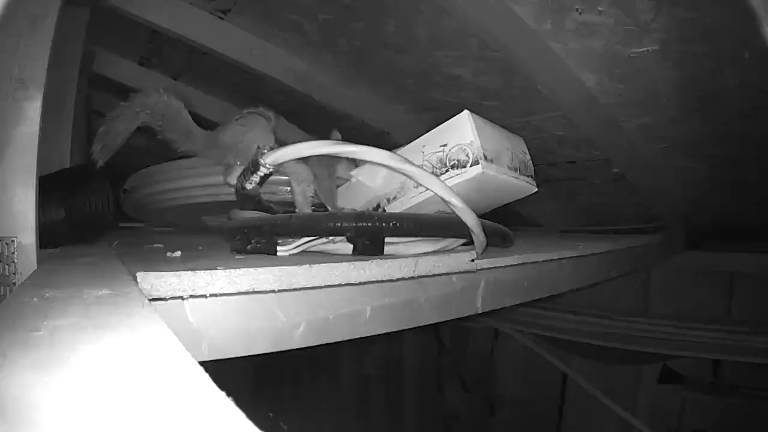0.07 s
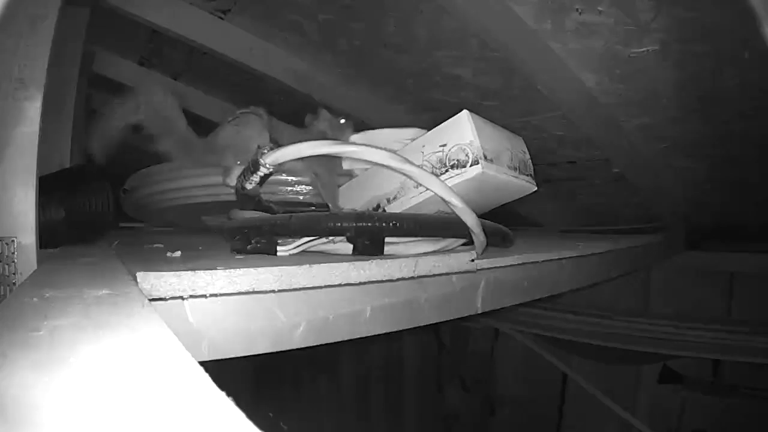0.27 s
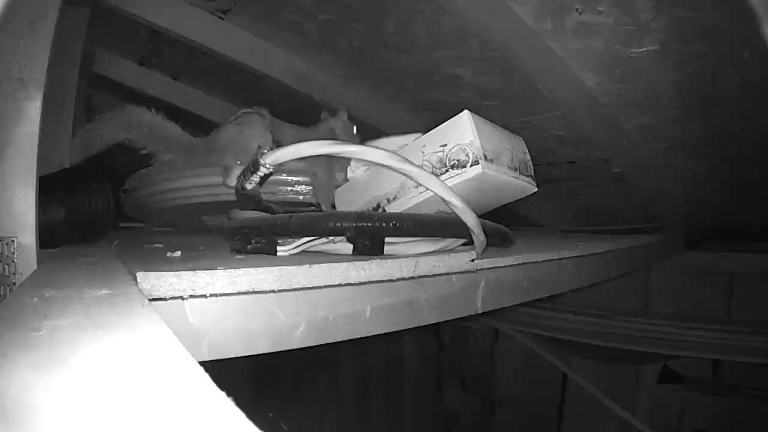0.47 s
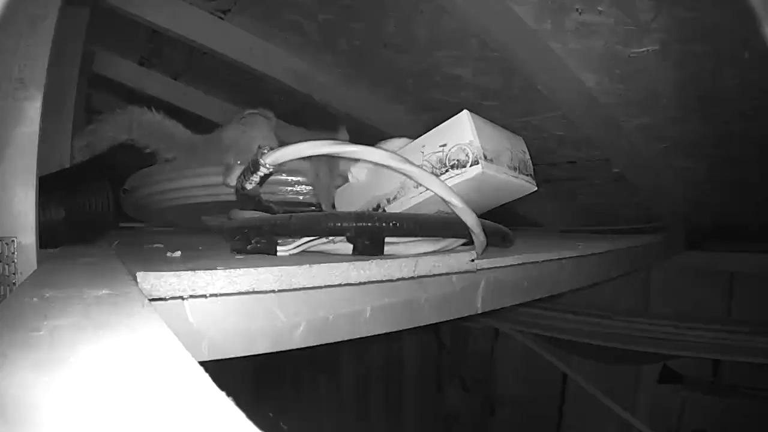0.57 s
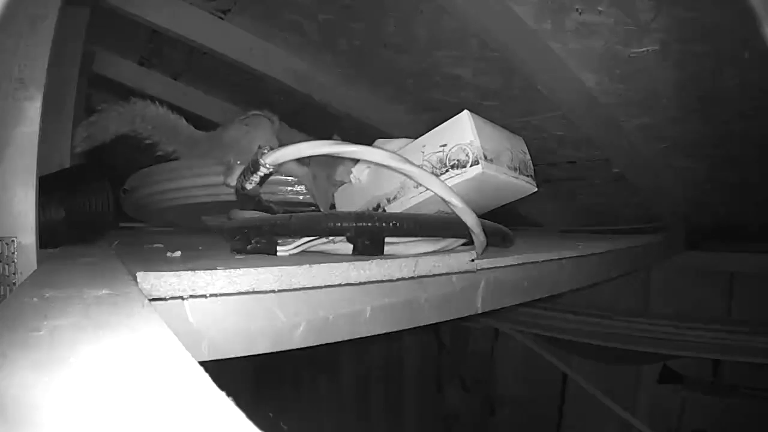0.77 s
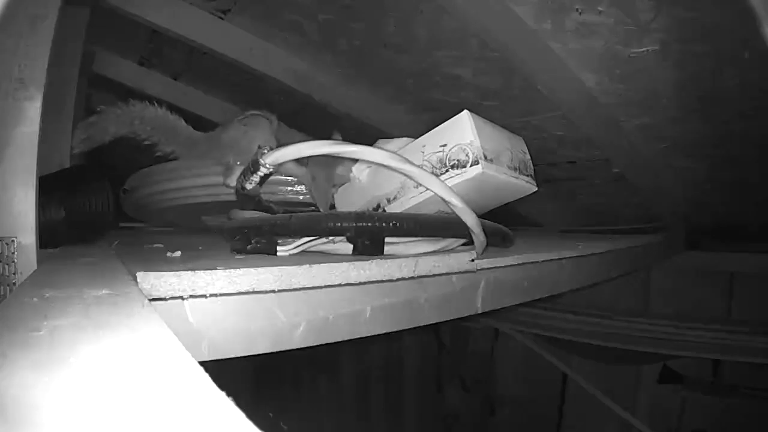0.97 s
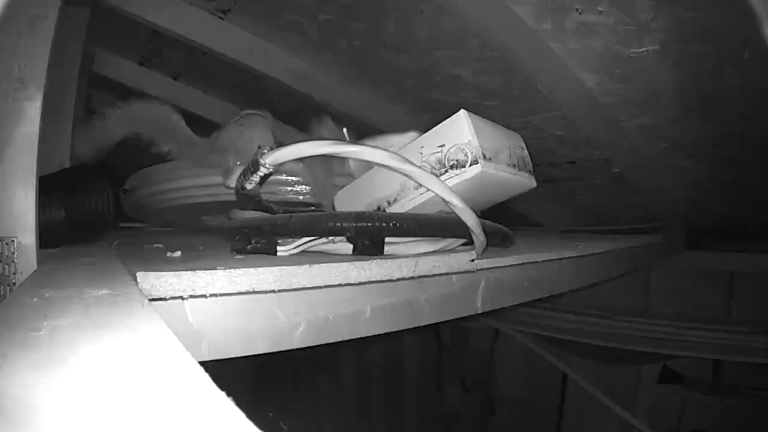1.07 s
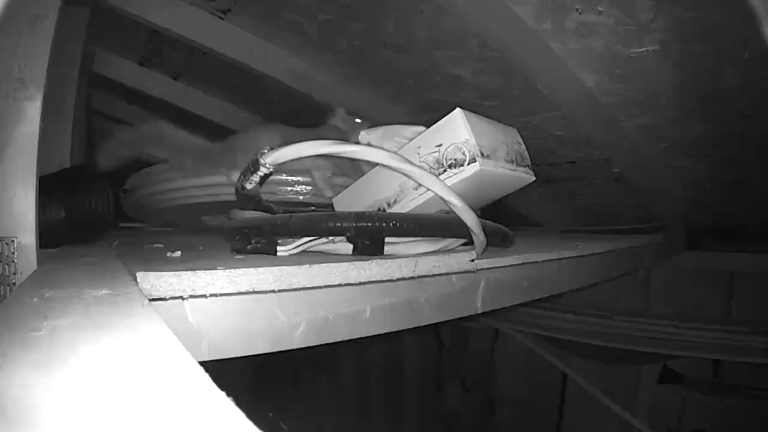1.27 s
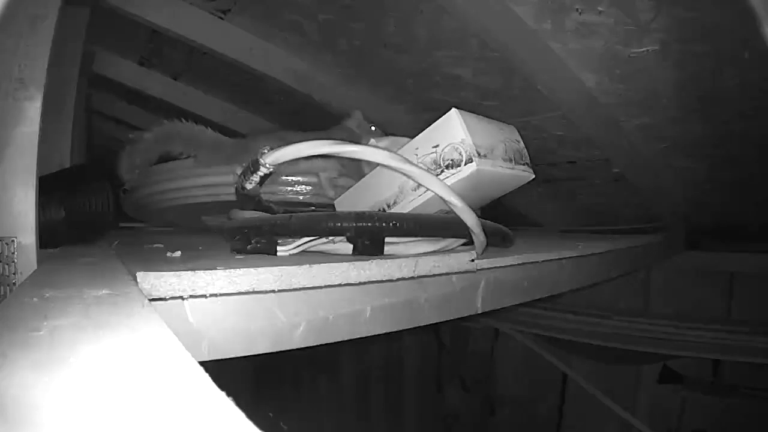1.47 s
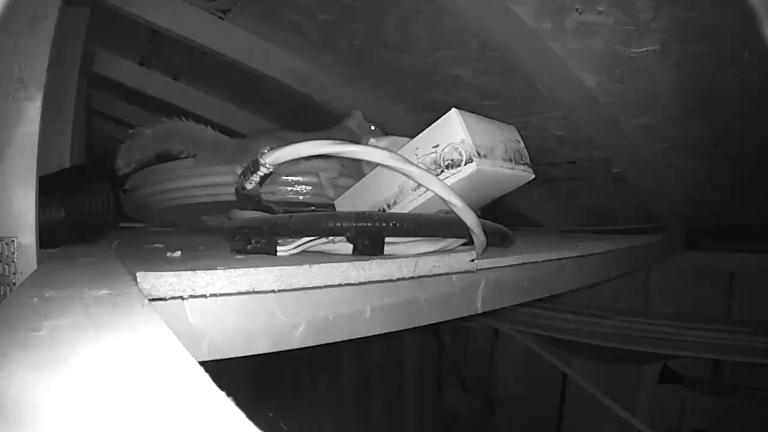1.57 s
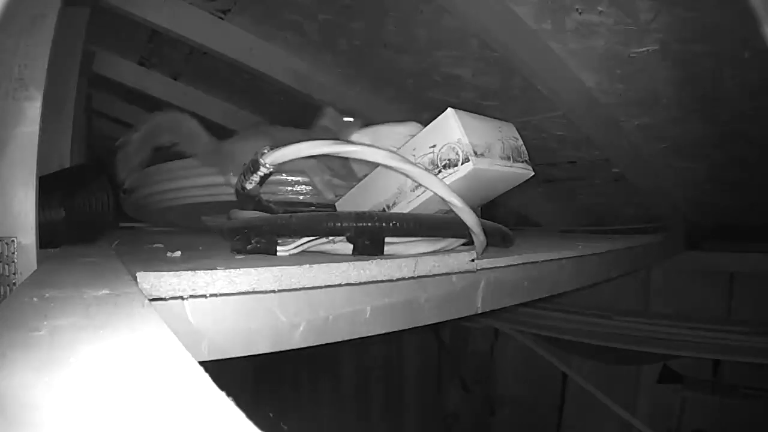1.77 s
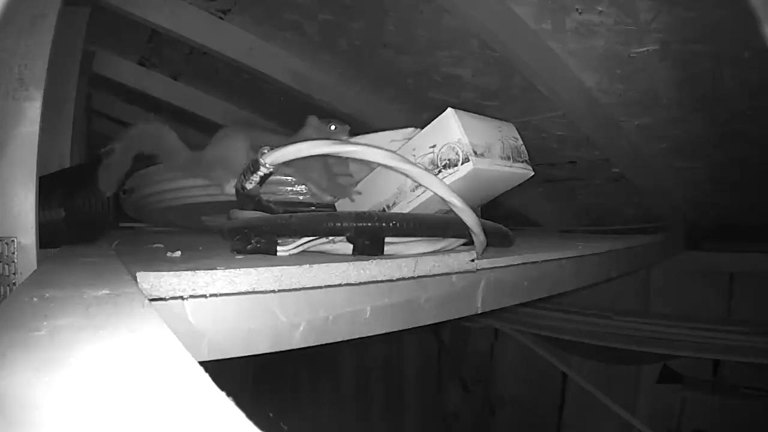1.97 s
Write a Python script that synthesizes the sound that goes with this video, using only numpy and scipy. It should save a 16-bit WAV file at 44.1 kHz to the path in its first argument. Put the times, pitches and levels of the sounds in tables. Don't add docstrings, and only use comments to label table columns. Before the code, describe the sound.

Rodent rustling through nest material in a quiet attic, box knocking on wood, claws ticking and scraping

```python
import sys
import numpy as np
from scipy import signal
from scipy.fft import rfft, irfft
from scipy.io import wavfile

SR = 44100
rng = np.random.default_rng(int(sys.argv[2]) if len(sys.argv) > 2 else 0)


def put_to_file(sound):
    columns = np.atleast_2d(sound).T
    safe = np.clip(columns, -1, 1)
    whole_steps = np.round(safe * 32767)
    wavfile.write(sys.argv[1], SR, whole_steps.astype(np.int16))


def linear_from_db(decibels):
    return 10 ** (np.asarray(decibels, float) / 20)


N = 88200

# pitch_hz, density_db [dB per Hz]
FIBRE_COLOUR = [(250, -48.5), (500, -4.5), (1140, -5), (1400, -3.5), (2700, -5), (3750, 0), (5300, -5.5),
                (7600, -23)]
GRAINS_PER_S, GRAIN_SPREAD_DB = 8000, 3.5


def rms_one(x):
    return x / np.sqrt(np.mean(x ** 2) + 1e-20)


def at_hz(points, hz):
    table_hz, value = np.transpose(points)
    return np.interp(np.log(hz), np.log(table_hz), value)


def colour(x, spectrum):
    hz = np.maximum(np.arange(len(x) // 2 + 1) * SR / len(x), 1)
    return irfft(rfft(x) * linear_from_db(at_hz(spectrum, hz)), len(x))


def band_pass(x, low_hz, high_hz):
    return signal.sosfilt(signal.butter(2, [low_hz, high_hz], "band", fs=SR, output="sos"), x)


def band(x, hz, share):
    return band_pass(x, hz / (1 + share / 2), hz * (1 + share / 2))


def drift(rate_hz):
    r = np.exp(-2 * np.pi * rate_hz / SR)
    wander = signal.lfilter([1], [1, -2 * r, r * r], rng.standard_normal(N + SR))
    return rms_one(wander[SR:])


def ring(clicks, hz, t60_s):
    r = linear_from_db(-60 / (t60_s * SR))
    w = 2 * np.pi * hz / SR
    return signal.lfilter([0, np.sin(w)], [1, -2 * r * np.cos(w), r * r], clicks + 1e-18)


def grains(rate_per_s, spread_db, size):
    chance, size_draw, sign_draw = rng.random((3, size))
    happens = chance < rate_per_s / SR
    height = linear_from_db(spread_db * np.minimum(-np.log(size_draw + 1e-9), 4))
    return happens * height * np.sign(sign_draw - 0.5)


def noise_line(hz, width_hz):
    t60_s = np.log(1000) / (np.pi * width_hz)
    return rms_one(ring(rng.standard_normal(N + SR), hz, t60_s)[SR:])


def floor():
    # pitch_hz, density_db [dB per Hz]
    rumble_colour = [(12, -36.5), (20, 3), (48, -4), (129, -4.5), (263, -14.5), (344, -11), (478, -21),
                     (551, -18), (600, -20), (780, -44), (1320, -120)]
    # pitch_hz, density_db [dB per Hz]
    hiss_colour = [(350, -31), (600, -11), (1260, -12), (1570, -13.5), (5220, -19), (6440, -10.5),
                   (7300, -14.5), (9490, -49.5), (16100, -120)]
    rumble = linear_from_db(-58.5) * rms_one(colour(rng.standard_normal(N), rumble_colour))
    hiss = linear_from_db(-67) * rms_one(colour(rng.standard_normal(N), hiss_colour))
    boom = linear_from_db(-66) * noise_line(104.2, width_hz=11.6)
    whine = linear_from_db(-77.5) * noise_line(6470, width_hz=80)
    return rumble + hiss + boom + whine


def attic(x):
    # pitch_hz, t60_s [time to fall by 60 dB]
    attic_decay = [(400, 0.53), (1000, .33), (2500, 0.22), (6000, 0.21)]
    tail_db, delay_s = -10.5, 0.005
    t = np.arange(SR // 2) / SR - delay_s
    white = rng.standard_normal(SR // 2)
    tail = np.zeros(SR // 2)
    for hz in 250 * 2 ** np.arange(6):
        octave = band_pass(white, hz / np.sqrt(2), hz * np.sqrt(2))
        tail += octave * linear_from_db(-60 * t / at_hz(attic_decay, hz))
    tail *= t > 0
    return linear_from_db(tail_db) * signal.fftconvolve(x, tail / np.sqrt(np.sum(tail ** 2)))[:N]


def thuds():
    # start_s, level_db [peak], pitch_hz, t60_s [time to fall by 60 dB]
    pushes = [(0.0, -50, 103, 0.83), (0.0, -55, 271.6, 0.17), (0.0, -53.5, 483, 0.13),
              (0.51, -52.5, 103, 0.19), (0.56, -50.5, 107, 0.21), (0.814, -52, 161, 0.18),
              (0.839, -61, 109, 0.24), (1.431, -58, 298, 0.16), (1.615, -55.5, 475, 0.093),
              (1.735, -51.5, 210, 0.14), (1.986, -51.5, 444, 0.13), (1.99, -45.5, 194, 0.13)]
    soft_s = 0.0023
    t, out = np.arange(N) / SR, np.zeros(N)
    for start_s, level_db, hz, t60_s in pushes:
        age = np.maximum(t - start_s, 0)
        envelope = linear_from_db(level_db - 60 * age / t60_s) * (1 - np.exp(-age / soft_s))
        out += envelope * np.sin(2 * np.pi * hz * age + rng.uniform(0, 2 * np.pi))
    return out


def rustle():
    # time_s, level_db
    busyness = [(0, -59.5), (0.25, -58), (0.5, -61), (0.6, -70), (0.68, -83), (0.721, -58.5), (0.83, -60.5),
                (0.89, -70.5), (0.999, -59.5), (1.09, -62.5), (1.179, -76.5), (1.32, -73.5), (1.4, -56),
                (1.57, -54), (1.61, -67.5), (1.75, -60), (1.85, -70), (2, -52.5)]
    time_s, table_db = np.transpose(busyness)
    level_db = np.interp(np.arange(N) / SR, time_s, table_db) - 0.5
    level_db += 2.25 * drift(30)
    crackle = colour(grains(GRAINS_PER_S, GRAIN_SPREAD_DB, N), FIBRE_COLOUR)
    return linear_from_db(level_db) * rms_one(crackle)


def scrapes():
    # start_s, length_s, level_db, pitch_hz, rise [share of the length spent swelling]
    strokes = [(0.01, 0.029, -61, 2500, 0.69), (0.121, 0.014, -40.5, 3250, 0.16),
               (0.133, 0.094, -47.5, 2300, .1), (0.298, 0.03, -57.5, 4020, .5),
               (0.382, 0.033, -54, 3830, .1), (0.699, 0.018, -58, 3830, .3),
               (0.719, 0.019, -53.5, 2670, 0.55), (0.775, 0.027, -53, 1410, 0.25),
               (0.939, 0.028, -62, 2030, 0.11), (0.964, 0.026, -56, 4000, .1),
               (1.038, 0.064, -57, 4020, 0.3), (1.331, 0.011, -51, 4640, .1),
               (1.353, 0.03, -46.5, 3200, 0.79), (1.426, 0.0053, -47.5, 2750, 0.087),
               (1.427, 0.0092, -48, 1690, 0.25), (1.429, 0.017, -45.5, 900, .3),
               (1.494, 0.026, -54, 3300, .15), (1.518, 0.027, -62, 3820, .3),
               (1.623, 0.018, -49.5, 5820, .15), (1.627, 0.019, -52.5, 4200, 0.3),
               (1.703, .018, -52, 3330, .1), (1.722, .025, -53.5, 2410, 0.29),
               (1.78, 0.0089, -58, 3000, .3), (1.898, 0.049, -52, 3600, 1)]
    broad_db, cut_share, release_s = 2, 0.37, 0.01
    size = 8192
    out, t = np.zeros(N + size), np.arange(size) / SR
    for start_s, length_s, level_db, hz, rise in strokes:
        clicks = grains(GRAINS_PER_S, GRAIN_SPREAD_DB, size)
        high_pass = signal.butter(2, cut_share * hz, "high", fs=SR, output="sos")
        broad = signal.sosfilt(high_pass, colour(clicks, FIBRE_COLOUR))
        tone = rms_one(band(clicks, hz, 1)) + linear_from_db(broad_db) * rms_one(broad)
        swell = np.minimum(t / (rise * length_s), 1)
        sag = linear_from_db(-4 * t / length_s)
        die = np.exp(-np.maximum(t - length_s, 0) / release_s)
        start = int(start_s * SR)
        out[start:start + size] += linear_from_db(level_db) * swell * sag * die * rms_one(tone)
    return out[:N] * linear_from_db(0.8 * drift(60))


def ticks():
    # start_s, level_db [peak], pitch_hz, length_s, share [width over pitch]
    skips = [(0.0303, -41.5, 2500, 0.004, 1.2), (0.3735, -40, 3000, .002, 1.4),
             (0.3749, -32, 3800, 0.0055, 0.64), (0.3752, -42.5, 1700, 0.0037, 0.83),
             (0.442, -47, 3040, .002, 0.51), (0.528, -43, 2870, 0.0045, 0.74),
             (0.7806, -41, 2480, 0.0023, 0.48), (0.9281, -31.5, 3560, 0.0043, 0.48),
             (0.9285, -38, 2120, 0.0056, .4), (0.959, -30.5, 3970, 0.0017, 1.6),
             (0.9607, -31.5, 4470, .0015, 1.6), (0.9619, -34.5, 3180, .005, 1.3),
             (1.0096, -41, 3600, 0.0023, .7), (1.331, -44, 4170, 0.0035, 1.1),
             (1.423, -31, 4350, .0015, .5), (1.4239, -30, 4080, 0.0037, 0.91),
             (1.4889, -31.5, 3600, 0.0037, .4), (1.7058, -38.5, 3530, .006, 0.41),
             (1.7426, -40.5, 3340, .007, 1.9)]
    crack_db, trim_db = -8, -1
    size = 2048
    out, t = np.zeros(N + size), np.arange(size) / SR
    for start_s, level_db, hz, length_s, share in skips:
        burst = grains(4200, 2.6, size) * np.exp(-(t / length_s) ** 2)
        burst[0] = 3.1
        crack = rms_one(band(burst, 4200, 3.1))
        tick = rms_one(band(burst, hz, share)) + linear_from_db(crack_db) * crack
        start = int(start_s * SR)
        out[start:start + size] += linear_from_db(level_db + trim_db) * tick / np.abs(tick).max()
    return out[:N]


def knock():
    # start_s, level_db, softness_hz [higher is harder]
    contacts = [
        (0.1160, -20, 1500),
        (0.1168, -17, 3000),
        (0.1178, -19, 5000),
        (0.1183, -13, 7240),
        (0.1249, -26.5, 4500),
        (0.1288, -29.5, 4500),
        (0.1352, -30.5, 4000),
    ]
    # pitch_hz, level_db, t60_s [time to fall by 60 dB]
    box_modes = [(500, -18, 0.025), (740, -22, 0.018), (1065, -13.5, 0.06), (1222, -9, 0.028),
                 (1525, -5.5, 0.013), (1820, -4.5, 0.011), (2337, -4, 0.023), (2870, -4, 0.014),
                 (3094, 1, 0.012), (3600, .5, .013), (4000, 1, 0.013), (4690, 2.5, 0.0063),
                 (5600, -14, 0.016), (6200, -8.5, 0.009)]
    size = 4096
    out = np.zeros(N)
    for start_s, level_db, soft_hz in contacts:
        click = np.zeros(size)
        click[0] = linear_from_db(level_db - 8.5)
        click = band_pass(click, 350, soft_hz)
        start = int(start_s * SR)
        for k, (hz, mode_db, t60_s) in enumerate(box_modes):
            strength = linear_from_db(mode_db + rng.normal(0, 1)) * (-1) ** k
            out[start:start + size] += strength * ring(click, hz, t60_s)
    return out


def scene():
    animal = knock() + ticks() + scrapes()
    return (animal + attic(animal) + rustle() + thuds() + floor())[None]


def band_limit(x):
    return signal.sosfilt(signal.butter(12, 8040, fs=SR, output="sos"), x)


def record(dry):
    low_pass = signal.cheby2(10, 50, 8344, fs=SR, output="sos")
    mix = signal.sosfilt(low_pass, dry) + 0.0012
    return band_limit(mix)


dry = scene()
out = record(dry)
put_to_file(out)
```